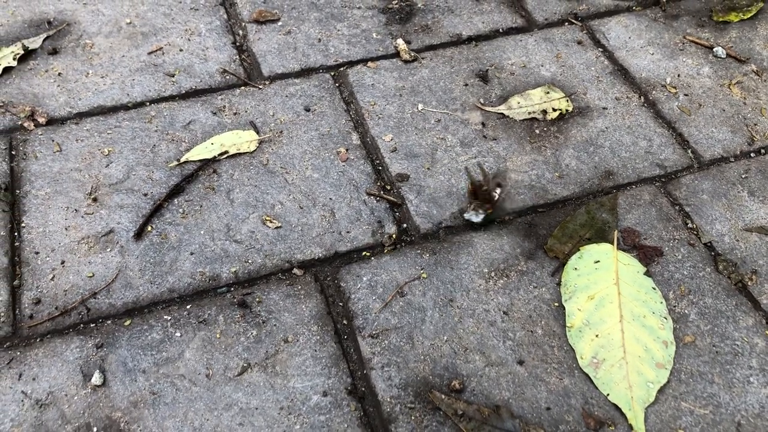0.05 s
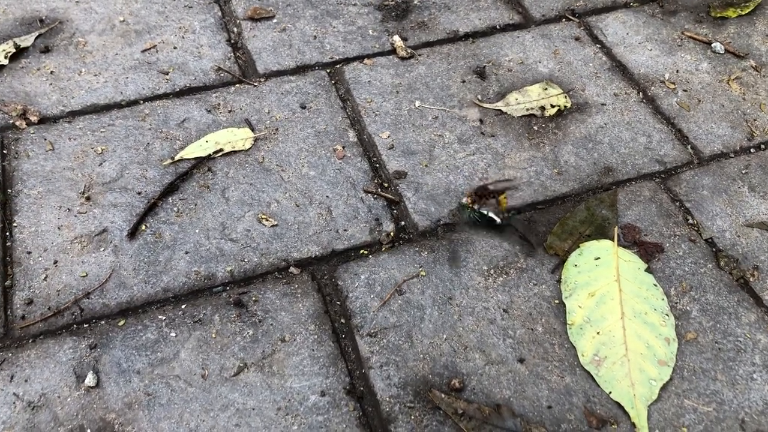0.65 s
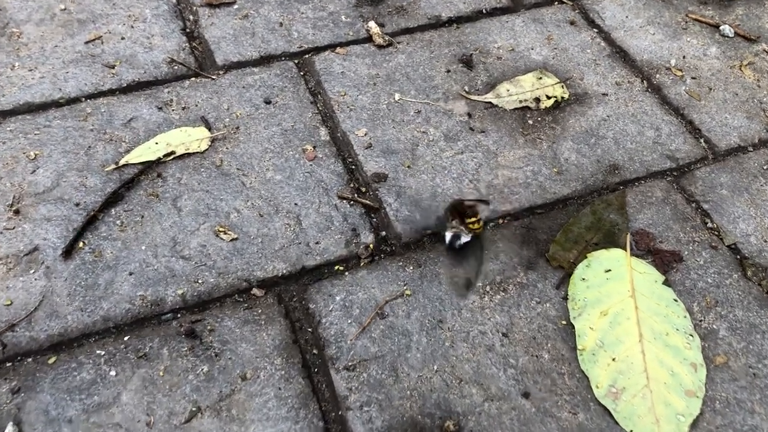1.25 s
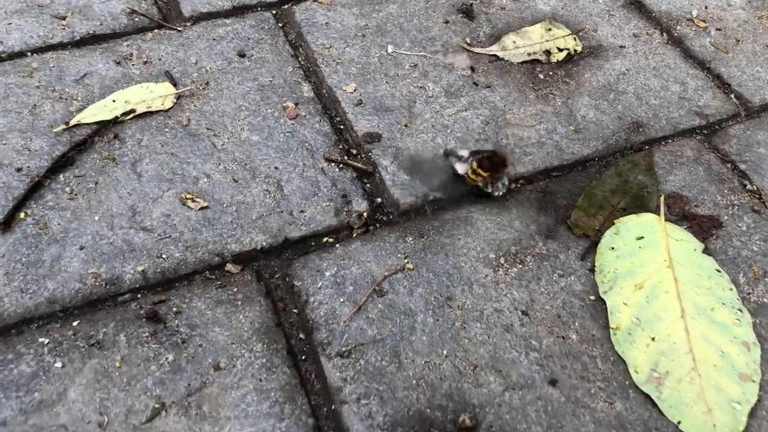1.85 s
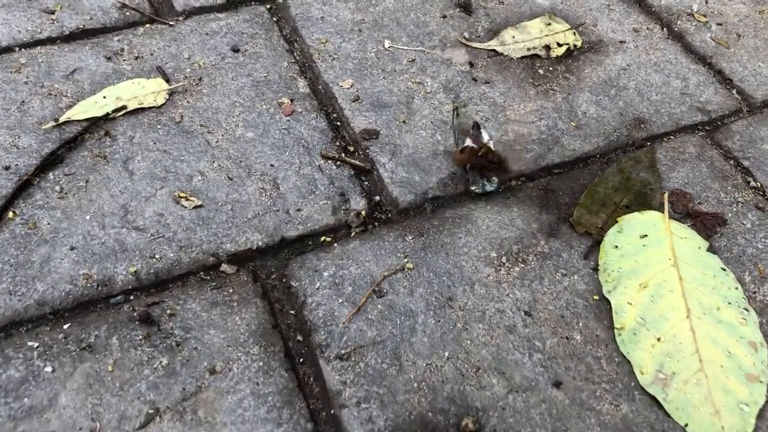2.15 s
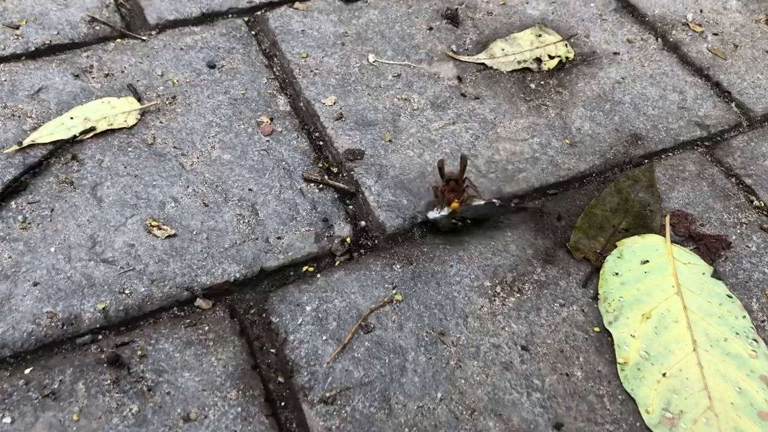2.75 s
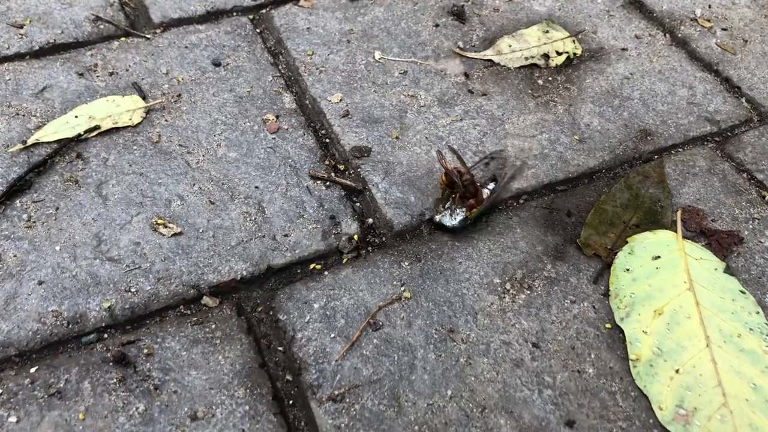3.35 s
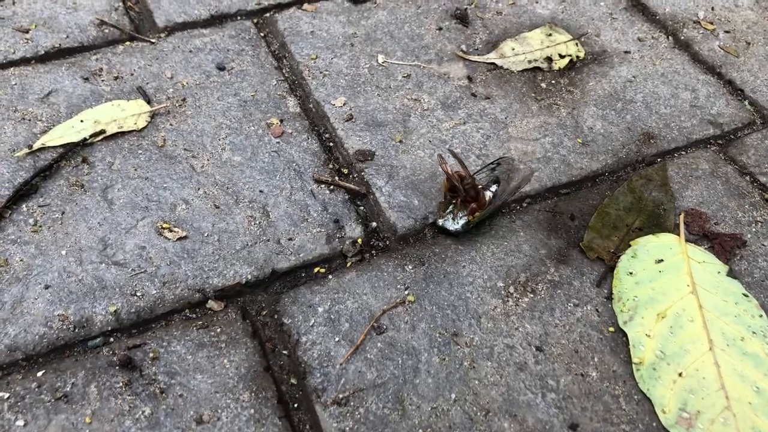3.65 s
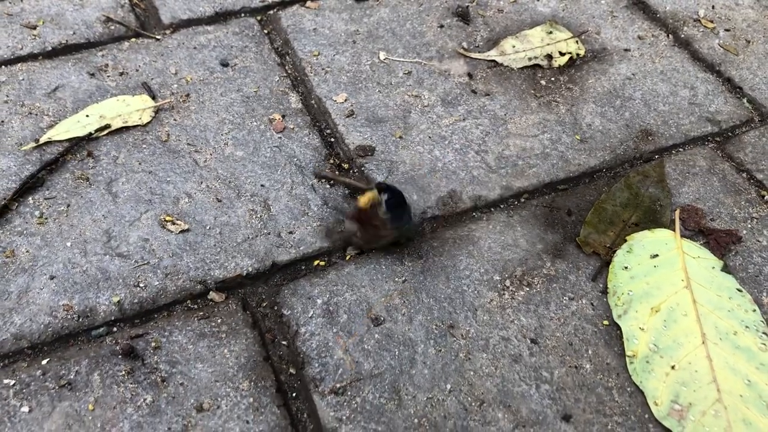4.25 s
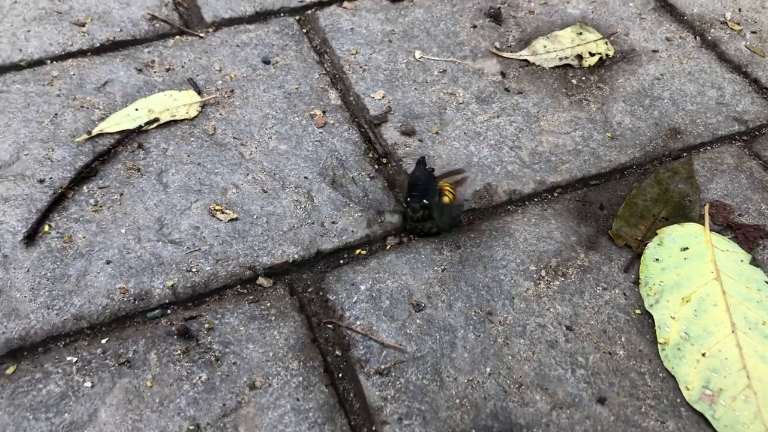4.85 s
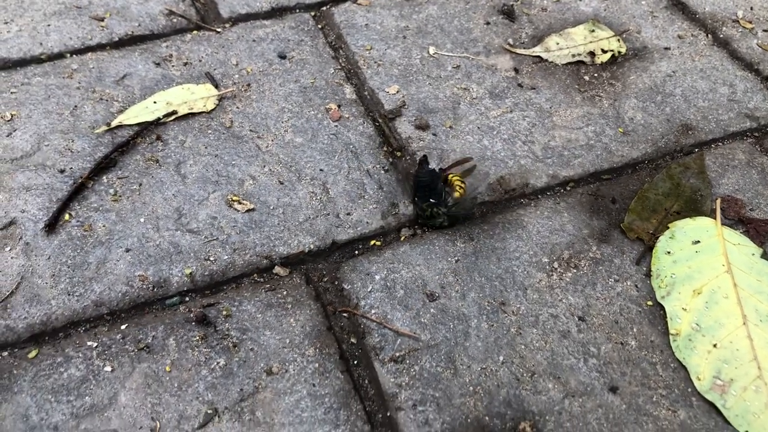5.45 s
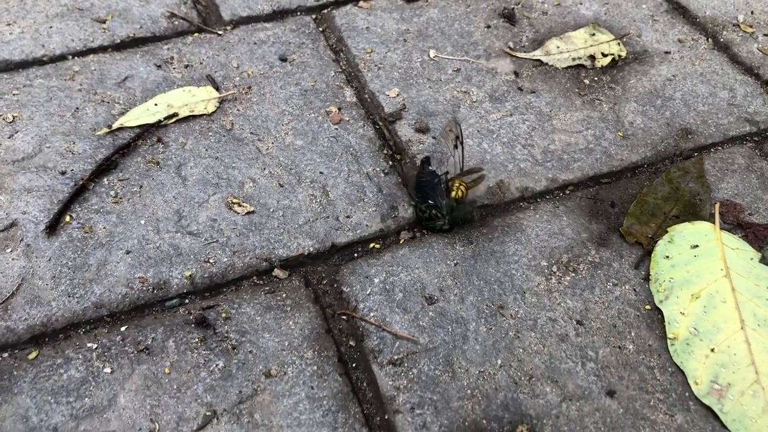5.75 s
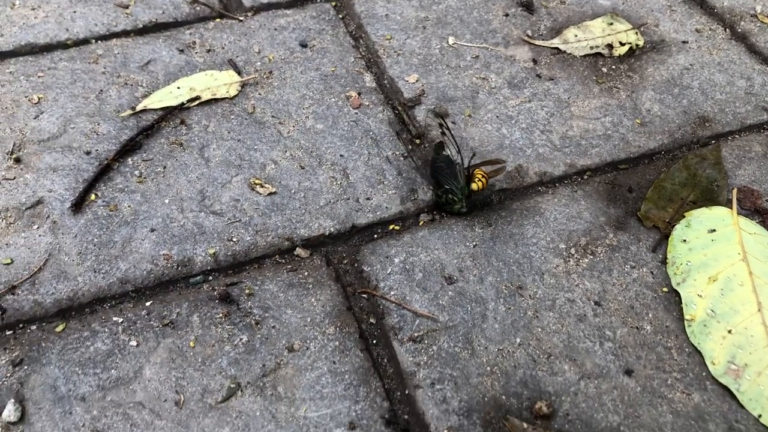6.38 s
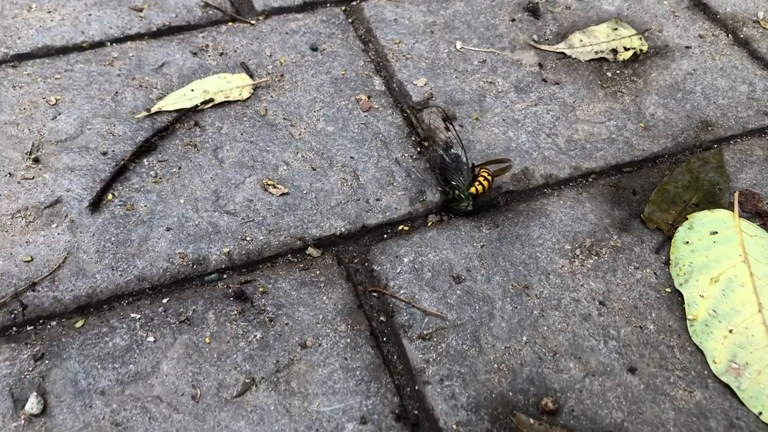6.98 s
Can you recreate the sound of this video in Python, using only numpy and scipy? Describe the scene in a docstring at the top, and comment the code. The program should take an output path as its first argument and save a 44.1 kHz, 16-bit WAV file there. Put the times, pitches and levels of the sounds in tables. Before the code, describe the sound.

Dry wing scrapes, sharp little slaps and gritty ticks sound near the microphone as a hornet grapples with a cicada on paving stones. The cicada squawks in choppy runs of bright clicks. After a short lull midway, the wings snap against the stone at their loudest, then settle, leaving scattered squawks and ticks. Behind it all is the steady low rumble of a far town in open air.

```python
"""A hornet wrestles a cicada on paving stones, close by, while a far town rumbles throughout.
From the start the cicada's stiff wings rustle over the stone and slap it, and it squawks in choppy
runs of double clicks as its tymbal (a springy plate on its body) buckles and springs back.
Near 3 s the wings rest and the squawks thin out. From 4 s to 5.6 s come the hardest slaps.
Last, the struggle dies down to short squawks and faint ticks, with soft hums from far away."""
import sys
import numpy as np
from scipy import signal
from scipy.fft import rfft, irfft, next_fast_len
from scipy.io import wavfile

SR = 44100
rng = np.random.default_rng(int(sys.argv[2]) if len(sys.argv) > 2 else 0)


def store_pcm(level_fs):
    """Save levels as 16-bit WAV."""
    pcm = np.round(np.clip(level_fs, -1, 1) * 32767).astype(np.int16)
    wavfile.write(sys.argv[1], SR, np.atleast_2d(pcm).T)


N = 318402
TIME = np.arange(N) / SR
REST_DB = -82.5   # the effort between bouts

# bouts of wrestling: start_s, end_s, effort_db, brightness_db
BOUTS = [(0, 0.159, -54.5, -0.5), (0.205, 0.269, -69.5, -2.5), (0.44, .58, -59, 3),
         (0.613, 0.846, -55.5, 0.5), (.96, 1.405, -55.5, -1), (1.624, 1.913, -52, 1.5),
         (1.96, 2.147, -55.5, -1.5), (2.30, 2.708, -56, 0.5), (2.77, 2.854, -66, 0.5),
         (2.897, 3.0, -75, 1.5), (3.26, 3.4, -77, 2.5), (3.928, 4.08, -52.5, 4), (4.14, 4.27, -53.5, 2),
         (4.35, 4.874, -62, -1), (5.26, 5.59, -71, -2), (6.28, 6.62, -78, 1)]
# a wing hits the stone: start_s, snap_db, body_db, knock_db, edge_db (the last three relative to snap_db)
SLAPS = [(.0078, -22.5, -3.5, -4, -15), (0.0956, -23, -2, -18, -1), (0.1307, -16.5, -16, -7, -7),
         (0.5532, -19.5, -18, -5, -3), (0.6054, -10, -9.5, -5.5, -4), (.7223, -22.5, -2, -1, -9),
         (0.8009, -22.5, -2, -9, -3), (.821, -26, 5, 3, -5), (0.9419, -24, -17, -17, -5),
         (0.9975, -14, -1.5, -1.5, -2), (1.0446, -12.5, -5, -5, -5), (1.1195, -20.5, -6, 1, 10),
         (1.1831, -14.5, -3, 0, -5), (1.2347, -21, -1, 4, -5), (1.2613, -19, -8, -2, -6),
         (1.2892, -19, 0, 1.5, -4), (1.3286, -19, 0, -4, 1), (1.3868, -16.5, 1, 1.5, 6),
         (1.6615, -22, -20, -17, 11), (1.7336, -14, -2.5, -7, -2), (1.7665, -18, -4, 1, -8),
         (1.8036, -14.5, -14, -5, -3), (1.8533, -13.5, -16, -3, -10), (1.8909, -15, -26, -9, -3),
         (1.9612, -15.5, -17, -4, -4), (2.0118, -20, -7, -4, 4), (2.0481, -18.5, -10, -12, 2),
         (2.114, -12, -11, -7, -10), (2.3212, -9, -13, -7, -1), (2.3517, -15, -11, -15, -2),
         (2.4232, -19, -10, -1, -1), (2.5065, -6, -8, -30, -2), (2.5649, -10.5, -4, -12, 0),
         (2.603, -14, -9.5, -4, -15), (2.6637, -11, -7, -3, 0), (2.7831, -20, -16, -4, -10),
         (3.9847, -12.5, -14.5, -20, -9), (4.0085, -19, -23, -10, -6.5), (4.0346, -13, -6.5, -11, 5),
         (4.123, -9, -14, -11, 1.5), (4.1348, -10.5, -23, 1, 13.5), (4.1681, -13, -25, -12, 7),
         (4.2041, -6.5, -12.5, -28, -8.5), (4.2077, -10, -8, -12, 7.5), (4.2112, -8, -9, -8, 2),
         (4.2485, -12, -7, -10, -1), (4.338, -20.5, -10.5, 2, 8), (4.4165, -1, -14, -14.5, -9),
         (4.495, -3.5, -13.5, -22, -10), (4.531, -14.5, -2, 7, 13.5), (4.5973, -1.5, -2.5, -19, 1.5),
         (4.6856, 2, -9, -22, -5), (4.7604, -20.5, -25, -9.5, 5), (4.7644, 0, -8.5, -11, -8.5),
         (4.7987, -10.5, -5.5, -1.5, 7), (4.8041, -7.5, -3.5, 0, 1), (4.9, -8.5, -11, -5.5, -6),
         (4.903, -2, -8, -10, -2.5), (5.007, -9.5, -8, 0, -3), (5.0095, -0.5, -7.5, -21, -2),
         (5.016, -17.5, -22, -3, 1), (5.3024, -25, 1, -11, 3), (5.3044, -5, -6, -1, 1),
         (5.3424, -3.5, -10, -1, -3.5), (5.4321, 3.5, -15.5, -15.5, -13), (5.5276, -8, -8.5, 3.5, 4),
         (5.6214, -3, -9.5, -22, -3.5)]


def from_db(db):
    """Turn decibels into a gain to multiply by."""
    return 10 ** (np.asarray(db) / 20)


def rms_one(x):
    """Scale a sound so that its average level (rms) is 1."""
    return x / np.sqrt(np.mean(x ** 2) + 1e-20)


def energy_one(x):
    """Scale a short sound so that its total energy is 1."""
    return x / np.sqrt(np.sum(x ** 2) + 1e-20)


def add(track, start_s, sound):
    """Mix a short sound into the track."""
    at = int(np.clip(round(start_s * SR), 0, N - 1))
    track[at:at + len(sound)] += sound[:N - at]


def band(x, low_hz, high_hz):
    """Keep the part of a sound between two pitches."""
    return signal.sosfilt(signal.butter(2, [low_hz, min(high_hz, .45 * SR)], "band", fs=SR, output="sos"), x)


def coloured(x, colour):
    """Shape a noise by rows of pitch_hz, level_db; it fades away beyond the first and last row."""
    hz, db = np.transpose(colour)
    size = next_fast_len(len(x))
    all_hz = np.maximum(np.fft.rfftfreq(size, 1 / SR), 1)
    ends = np.minimum(all_hz / hz[0], 1) ** 2 * np.minimum(hz[-1] / all_hz, 1) ** 2
    gain = from_db(np.interp(np.log(all_hz), np.log(hz), db))
    return rms_one(irfft(rfft(x, size) * ends * gain, size)[:len(x)])


def drift(rate_hz):
    """A smooth random wander, about 1 in size."""
    return rms_one(signal.sosfilt(signal.butter(2, rate_hz, fs=SR, output="sos"), rng.standard_normal(N)))


def town(wash_db=-56, swell_db=1.5, split_hz=300, air_db=-64):
    """Far traffic: a low rumble and a softer, gently swelling wash above it, with a faint hiss of air."""
    # tone of the traffic: pitch_hz, level_db
    traffic_colour = [(15, -66), (25, -27.5), (41, -10.5), (102, -1), (182, -8), (229, -10.5), (357, -13.5),
                      (525, -16.5), (802, -16.5), (936, -16), (1200, -18.5), (1640, -22), (2140, -32),
                      (2310, -31.5), (2500, -49.5), (3250, -47), (5500, -120)]
    # tone of the open air: pitch_hz, level_db
    air_colour = [(1000, 10.5), (2000, 7.5), (3000, 2), (5000, -3), (8000, -8.5), (12000, -14),
                  (16000, -16)]
    # loudness of the rumble: time_s, level_db
    rumble_levels = [(0, -50.5), (2.6, -49.5), (3.9, -50.5), (4.2, -51), (5.5, -50.5), (7.22, -50.3)]
    rumble_gain = from_db(np.interp(TIME, *np.transpose(rumble_levels)))
    wash_gain = from_db(wash_db + swell_db * drift(rate_hz=2.6))
    traffic = coloured(rng.standard_normal(N), traffic_colour)
    rumble = signal.sosfiltfilt(signal.butter(2, split_hz, fs=SR, output="sos"), traffic, padtype="even")
    air = from_db(air_db) * coloured(rng.standard_normal(N), air_colour)
    return rumble_gain * rms_one(rumble) + wash_gain * rms_one(traffic - rumble) + air


def effort_db(time_s, rise_db_per_s=898, fall_db_per_s=450):
    """How hard the two insects wrestle: each bout flares up, holds and dies away."""
    start_s, end_s, db, _ = np.transpose(BOUTS)[..., None]
    before_db = rise_db_per_s * np.maximum(start_s - time_s, 0)
    after_db = fall_db_per_s * np.maximum(time_s - end_s, 0)
    return np.maximum((db - before_db - after_db).max(axis=0), REST_DB)


def fidgets(per_s, above_db, uneven_db):
    """Times and levels of small, loosely paced movements in the bouts, as strong as the effort."""
    timing, strength = rng.random((600, 2)).T
    start_s = (np.arange(len(timing)) + timing) / per_s
    db = effort_db(start_s) + above_db + uneven_db * (2 * strength - 1)
    wrestling = (effort_db(start_s) > REST_DB) & (start_s < TIME[-1])
    return start_s[wrestling], db[wrestling]


def wing_strokes(drag_db=-38.5, drag_s=.0045, light_s=.0046, boost_db=.5):
    """How strongly the wings rub over time: hard sweeps, a drag after each hard slap, light strokes."""
    # a wing sweeps hard over the stone: start_s, level_db, length_s
    sweeps = [(.049, -51, 0.002), (.467, -43, .005), (.652, -47, 0.013), (.766, -34.5, 0.0025),
              (.839, -52, 0.0096), (1.156, -36, 0.0036), (1.288, -37, 0.0032), (1.6262, -42.5, 0.012),
              (1.688, -47, 0.006), (1.7664, -32.5, .0053), (1.988, -45, 0.0058), (2.2537, -46.5, 0.0058),
              (2.371, -39, .003), (2.536, -42, 0.0048), (2.615, -34.5, 0.0035), (2.679, -36, .009),
              (3.952, -37.5, .005), (3.987, -35, 0.0073), (4.338, -34.5, 0.0088), (4.419, -33.5, .009),
              (4.4955, -35, 0.0074), (4.528, -33.5, 0.01), (4.733, -39.5, .0056), (5.339, -34, 0.0022),
              (5.561, -42.5, .004), (6.3765, -52, .0025), (6.9532, -48, .002)]
    drags = [(s, drag_db + .33 * snap_db, drag_s) for s, snap_db, *_ in SLAPS]
    light = [(s, db, light_s) for s, db in zip(*fidgets(per_s=42, above_db=12, uneven_db=8))]
    strokes = np.zeros(N)
    for start_s, db, length_s in list(sweeps) + drags + light:
        age = TIME[:SR // 12] / length_s
        pressure = (1 - np.exp(-10 * age)) / (1 + age ** 4)   # presses, holds, then lifts off
        add(strokes, start_s, from_db(db + boost_db) * pressure)
    return strokes


def grains(per_s, spread_db):
    """Tiny contacts at random moments, of very uneven size."""
    sizes = from_db(spread_db * np.minimum(rng.exponential(1, N), 4)) * rng.choice([-1, 1], N)
    return sizes * (rng.random(N) < per_s / SR)


def wing_rustle(scuffle_db=-6, fitful_db=4, grit_db=-9, split_hz=9000):
    """Wing veins catch on the stone in short strokes; between them the legs scuffle and shift grit."""
    # tone of a wing brushing stone: pitch_hz, level_db
    brush_colour = [(700, -6), (1400, 1), (2500, -3), (4500, 0), (7000, 2), (9500, -1), (11500, 1),
                    (15000, 1), (16500, -19)]
    strokes = wing_strokes()
    effort = from_db(effort_db(TIME))
    scuffle = effort * from_db(scuffle_db + fitful_db * np.clip(drift(rate_hz=40), -2, 2))
    scraping = coloured(grains(per_s=22000, spread_db=4), brush_colour)
    dull = signal.sosfiltfilt(signal.butter(2, split_hz, fs=SR, output="sos"), scraping)
    # a wing's edge scrapes brighter than its flat side; the angle holds through each bout
    bouts = np.array(BOUTS)
    brightness = from_db(np.interp(TIME, bouts[:, :2].ravel(), bouts[:, 3].repeat(2)))
    scraping = rms_one(dull / brightness + (scraping - dull) * brightness)
    grit = rms_one(band(grains(per_s=140, spread_db=8), 4000, 15000))
    return np.hypot(strokes, scuffle) * scraping + effort * from_db(grit_db) * grit


def light_flaps(body_db=-2, knock_db=-3, edge_db=-6, spread_db=3):
    """Light wing strikes during the bouts, each with its own tone; columns as in SLAPS."""
    start_s, snap_db = fidgets(per_s=11, above_db=27.5, uneven_db=2)
    colour = [body_db, knock_db, edge_db] + spread_db * rng.standard_normal((len(start_s), 3))
    return np.column_stack([start_s, snap_db, colour])


def wing_slaps(thud_db=-12, crumple_db=2.5, crumple_s=.0021, shiver_db=-16, shiver_s=.012):
    """A wing hits the stone: a hard contact, an instant of crumpling, then a brief shiver."""
    # ranges in which a wing rings (thud, body, knock, snap, edge): low_hz, high_hz
    wing_bands = [(720, 1590), (1950, 3890), (4350, 6550), (7200, 11200), (13000, 15540)]
    start_s, snap_db, body_db, knock_db, edge_db = np.vstack([SLAPS, light_flaps()]).T
    t = TIME[:SR // 30]
    crumple = from_db(crumple_db) * energy_one(from_db(-60 * t / crumple_s))
    shiver = from_db(shiver_db) * energy_one(from_db(-60 * t / shiver_s))
    force = rng.standard_normal((len(start_s), len(t))) * (crumple + shiver)
    force[:, 0] = 1   # the hard contact
    slaps = 0
    for (low_hz, high_hz), db in zip(wing_bands, [body_db + thud_db, body_db, knock_db, 0, edge_db]):
        rings = band(force, low_hz, high_hz)
        gain = from_db(snap_db + db) / np.linalg.norm(rings, axis=1)
        slaps = rings * gain[:, None] - slaps   # neighbouring ranges swing in opposite directions
    out = np.zeros(N)
    for at, slap in zip(start_s, slaps):
        add(out, at, slap)
    return out


def tymbal_clicks(tones, treble_db, detune, uneven_db):
    """One click a row: the plate's tones die within milliseconds, a little different each time."""
    hz, db, ring_s, direction = np.transpose(tones)
    t = TIME[:SR // 125]
    chance = rng.standard_normal((len(treble_db), 1 + len(hz)))
    beamed = np.interp(hz, [5030, 7050, 10100, 14500], [.012, .94, .9, .2])   # how much facing matters
    gains = np.sign(direction) * from_db(db + beamed * treble_db[:, None] + uneven_db * chance[:, 1:])
    tension = 1 + detune * chance[:, :1]   # all tones shift together
    phase = 2 * np.pi * (hz * tension)[..., None] * t
    return np.sum(gains[..., None] * np.sin(phase) * from_db(-60 * t / ring_s[:, None]), axis=1)


def cicada(release_db=2.9, release_s=.00285, jitter_s=.00014):
    """Each muscle pull buckles the tymbal with a low click; it springs back with a higher one."""
    # squawks of evenly paced pulls: start_s, length_s, pull_count, level_db
    squawks = [(0.0152, 0.028, 3, -43.5), (.1065, 0.055, 4, -44.5), (0.3432, .018, 2, -41.5),
               (.4041, 0, 1, -41.5), (.457, .069, 5, -43), (.545, .046, 4, -44), (.622, 0.083, 6, -44.5),
               (0.7272, 0.04, 4, -42.5), (0.9616, 0.017, 2, -42.5), (1.0384, 0.043, 2, -43),
               (1.1086, 0.027, 3, -45), (1.28, 0.057, 4, -43.5), (1.4023, 0, 1, -43),
               (1.633, 0.055, 4, -42.5), (1.719, .0317, 2, -42), (1.8269, 0.063, 5, -42.5),
               (2.0806, 0, 1, -41), (2.2898, 0.047, 4, -42.5), (2.4987, 0.025, 2, -43),
               (2.8173, 0.03, 2, -40), (2.907, 0, 1, -40.5), (3.0304, 0, 1, -42), (3.2254, 0, 1, -41),
               (3.3463, .0138, 2, -41.5), (3.4036, 0, 1, -41), (3.584, 0.012, 2, -42),
               (3.6743, 0.1, 3, -41.5), (3.835, 0.058, 3, -39.5), (4.152, .046, 3, -41.5),
               (4.253, .037, 3, -43.5), (4.4395, 0.039, 3, -43), (4.5494, 0.065, 4, -45), (4.67, 0, 1, -44),
               (4.846, .013, 2, -47), (5.4957, .07, 2, -45), (5.6638, 0.074, 2, -46.5),
               (5.9124, 0.006, 1, -46.5), (6.0628, 0, 1, -45.5), (6.1726, 0, 1, -43.5), (6.291, 0, 1, -42),
               (6.4513, .017, 2, -41.5), (6.4995, 0, 1, -42), (6.5562, .038, 3, -42.5), (6.6611, 0, 1, -45),
               (6.9801, 0.022, 2, -43), (7.0824, .048, 4, -43)]
    # the tymbal buckling in: pitch_hz, level_db, ring_s (time to fade by 60 dB), direction (+1 or -1)
    buckle_tones = [(2260, -1, 0.0032, 1), (3394, 10, 0.0053, -1), (4500, -3, 0.004, -1),
                    (5580, -2.5, .0027, -1), (9150, 8, 0.0018, 1), (14670, 1, .0014, -1)]
    # the tymbal springing out: pitch_hz, level_db, ring_s, direction
    release_tones = [(4680, 10, 0.0033, 1), (5390, 3, 0.0025, -1), (6400, -3.5, 0.0019, 1),
                     (7170, -4.5, 0.0067, -1), (9230, 13, 0.0016, -1), (10340, 8, 0.0014, 1),
                     (14340, 5, .0011, -1)]
    # how the tymbal faces the listener: time_s, treble_db, outward_click_db
    facing = [(0, 1.5, -3), (.5, -5, 3.5), (.8, -1, 3), (1.7, 4.5, 1.5), (2.9, -2.5, 1), (3.9, -2.5, 0),
              (4.4, -10, 0.5), (5.7, -2.5, -1.5), (6.3, -5, 0), (6.6, -3, -1.5), (7.2, -7.5, 1.5)]
    pulls = [(at, db) for s, length_s, count, db in squawks for at in np.linspace(s, s + length_s, count)]
    pull_s, pull_db = np.transpose(pulls)
    turn_s, *turn_levels = np.transpose(facing)
    treble_db, outward_db = [np.interp(pull_s, turn_s, column) for column in turn_levels]
    inward = tymbal_clicks(buckle_tones, treble_db, detune=.012, uneven_db=1.27)
    outward = tymbal_clicks(release_tones, treble_db, detune=.015, uneven_db=.5)
    outward *= from_db(outward_db)[:, None]
    holds_s = release_s + jitter_s * rng.standard_normal(len(pulls))
    out = np.zeros(N)
    for at, db, hold_s, click_in, click_out in zip(pull_s, pull_db, holds_s, inward, outward):
        add(out, at, from_db(db) * click_in)
        add(out, at + hold_s, from_db(db + release_db) * click_out)
    return out


def claw_ticks(fade_s=.004, low_hz=4000, high_hz=15500):
    """Tiny bright contacts, each a short crunch: some at set times, more at random during the bouts."""
    # a claw or wing tip ticks sharply on the grit: start_s, energy_db
    sharp_ticks = [(.7968, -24), (1.213, -15), (1.628, -15), (1.6869, -16), (1.9455, -28), (2.7012, -16),
                   (2.959, -37), (3.275, -38), (4.0886, -21), (4.933, -21), (5.2493, -32.5), (6.0145, -40),
                   (6.4926, -31), (6.6489, -38), (7.077, -39)]
    ticks = list(sharp_ticks) + list(zip(*fidgets(per_s=9, above_db=31, uneven_db=2)))
    t, out = TIME[:SR // 100], np.zeros(N)
    bursts = rng.standard_normal((len(ticks), len(t))) * from_db(-60 * t / fade_s)
    for (start_s, db), crunch in zip(ticks, band(bursts, low_hz, high_hz)):
        add(out, start_s, from_db(db) * energy_one(crunch))
    return out


def yard_echoes(x, bounce_db=-23, bounce_s=.0044, near_db=-20, near_fade_s=.074,
                far_db=-30.5, far_fade_s=.28):
    """One close bounce, quick scatter from things nearby, and a faint tail from walls further off."""
    t = TIME[:SR // 2]
    near = rng.standard_normal(len(t)) * from_db(-60 * t / near_fade_s) * (t > .001)
    far = band(rng.standard_normal(len(t)), 600, 13000) * from_db(-60 * t / far_fade_s) * (t > .012)
    echoes = from_db(near_db) * energy_one(near) + from_db(far_db) * energy_one(far)
    echoes[round(bounce_s * SR)] += from_db(bounce_db)
    return signal.fftconvolve(x, echoes)[:N]


def far_swells():
    """Breathy hums and a faint hiss rise and fall far away."""
    # swells of distant noise: peak_s, level_db, width_s, low_hz, high_hz
    swells = [(5.54, -53, 0.066, 780, 988), (6.25, -69.5, 0.068, 2000, 5500), (6.42, -58, 0.11, 402, 526),
              (7.08, -60.5, 0.072, 400, 520)]
    out = np.zeros(N)
    for peak_s, db, width_s, low_hz, high_hz in swells:
        swell = from_db(db) * np.exp(-((TIME - peak_s) / width_s) ** 2)
        out += swell * rms_one(band(rng.standard_normal(N), low_hz, high_hz))
    return out


def scene():
    """The town, the struggle on the ground and its echoes, in one channel."""
    background = town() + far_swells()
    struggle = wing_rustle() + wing_slaps() + cicada() + claw_ticks()
    return (background + struggle + yard_echoes(struggle))[None]


def record(dry, bass_hz=30, top_hz=16700):
    """The small microphone loses the deepest bass; the highest treble is cut steeply."""
    thin = signal.sosfilt(signal.butter(2, bass_hz, "high", fs=SR, output="sos"), dry)
    return signal.sosfilt(signal.ellip(10, .3, 70, top_hz, fs=SR, output="sos"), thin)


dry = scene()
out = record(dry)
store_pcm(out)
```